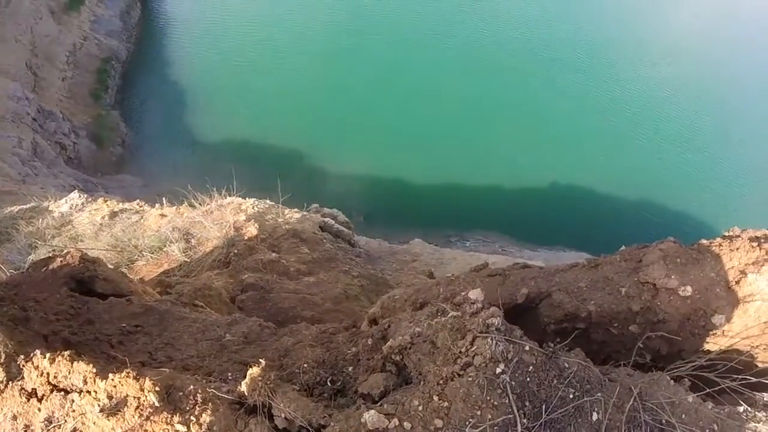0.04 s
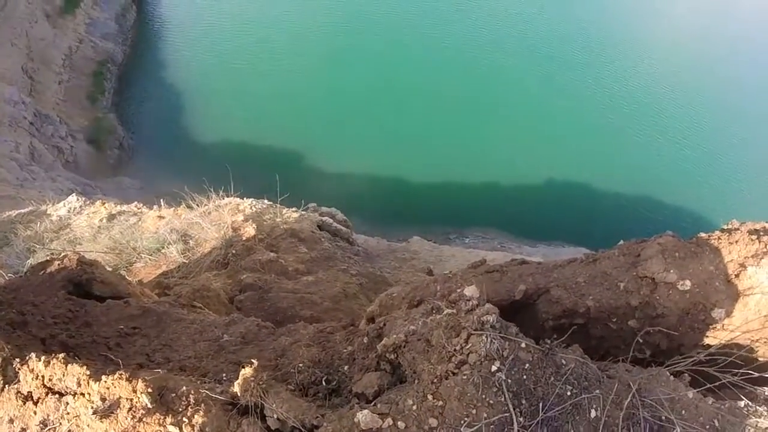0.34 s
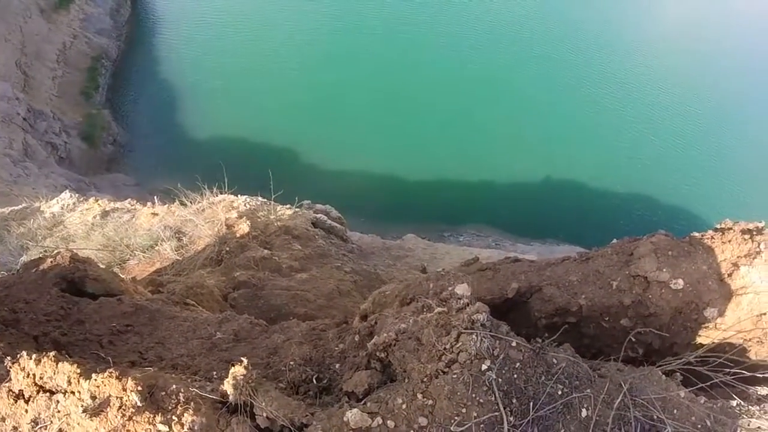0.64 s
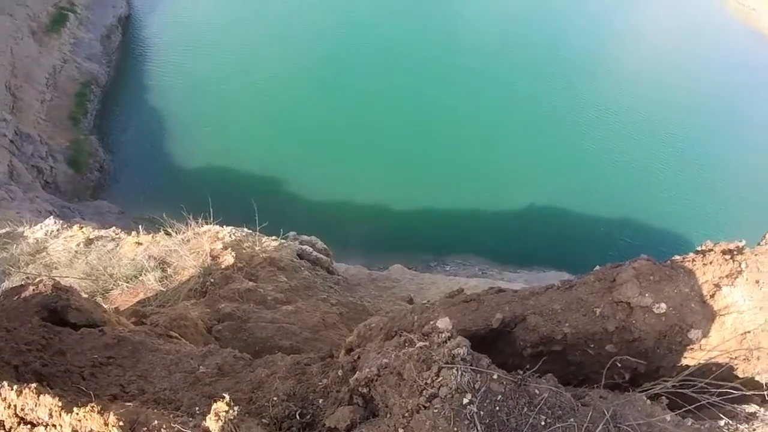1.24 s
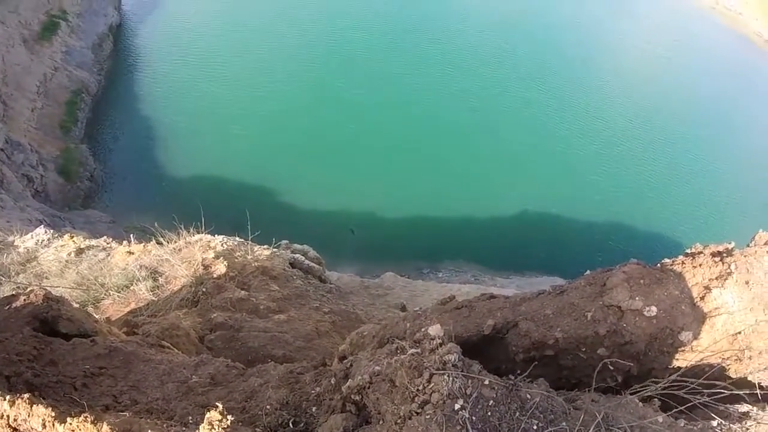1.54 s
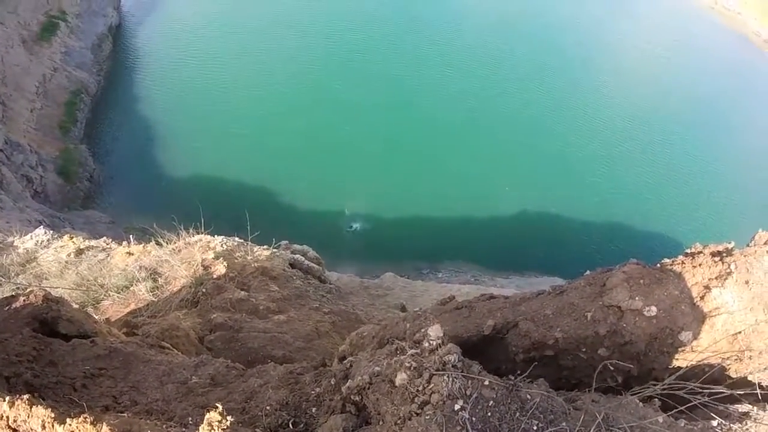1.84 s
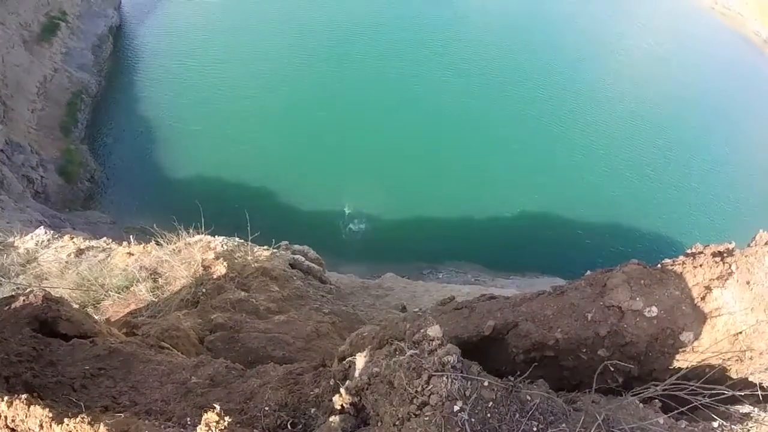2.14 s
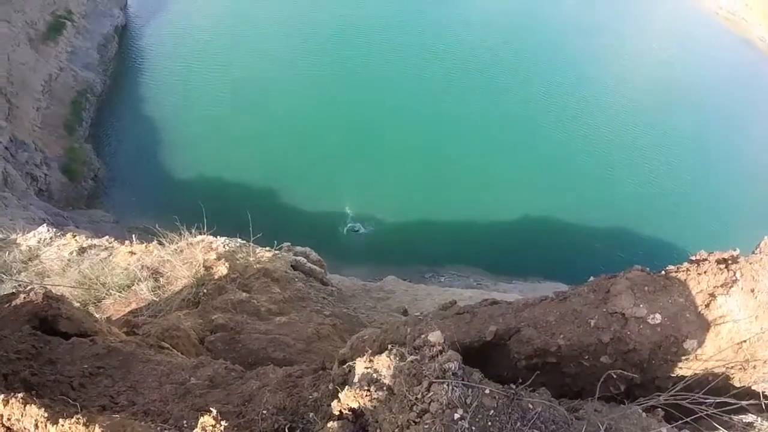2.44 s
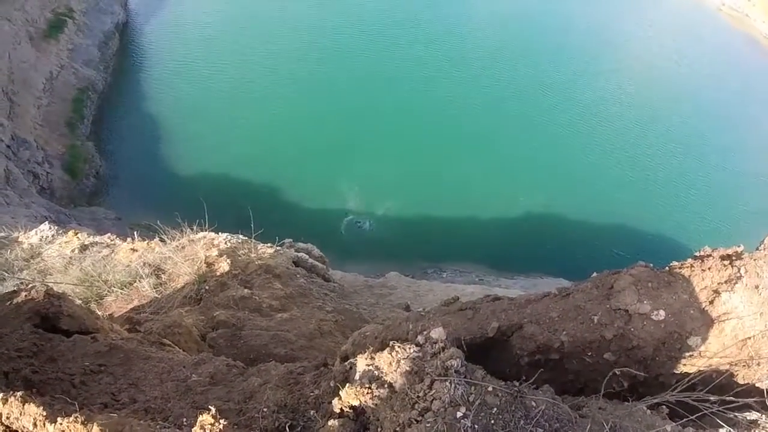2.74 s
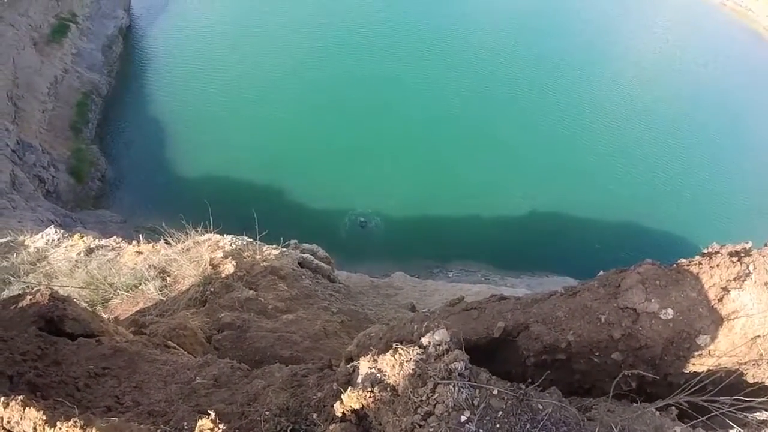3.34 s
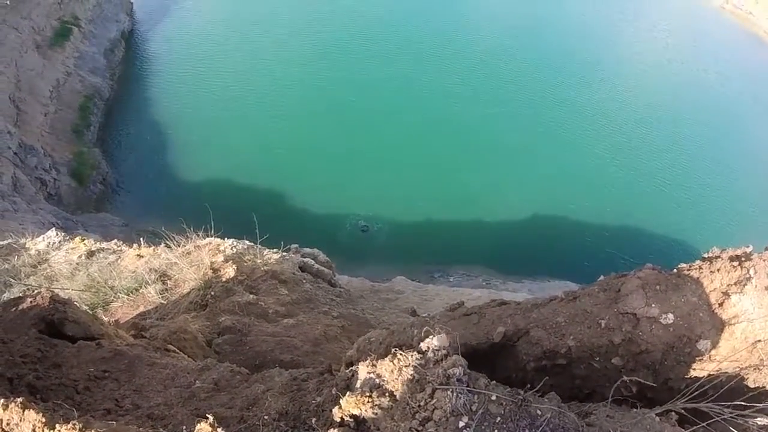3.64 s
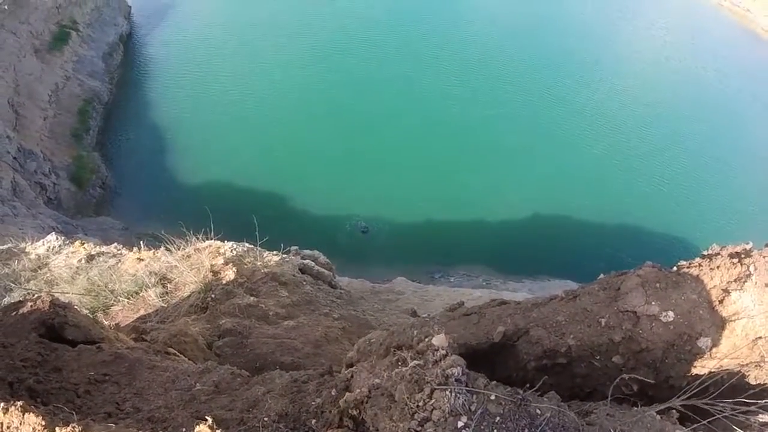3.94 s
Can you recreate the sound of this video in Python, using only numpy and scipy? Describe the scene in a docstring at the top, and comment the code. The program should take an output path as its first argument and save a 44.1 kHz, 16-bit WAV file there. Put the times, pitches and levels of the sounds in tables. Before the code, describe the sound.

A distant splash in a lake, with gusty wind rumbling on the microphone.

```python
"""Wind rumbles and buffets the microphone from the start, with soft rustles and ticks of grit nearby.
Just before two seconds, a thrown object hits a quarry lake far below the cliff edge: a slap, a burst
of torn water, then spray pattering back. Trapped air rings as bubbles, and the quarry walls echo.
The gusts are hardest after the splash, when swirls of air (eddies) thump and flap on the microphone.
A faint hiss lies under it all."""
import sys
import numpy as np
from scipy import signal
from scipy.fft import rfft, irfft
from scipy.io import wavfile
from scipy.ndimage import uniform_filter1d

SR = 44100
rng = np.random.default_rng(int(sys.argv[2]) if len(sys.argv) > 2 else 0)


def dump(signal):
    """Clip the signal to [-1, 1] and save it as 16-bit WAV at the path in sys.argv[1]."""
    limited = np.clip(np.atleast_2d(signal).T, -1, 1)
    pcm = np.round(limited * 32767).astype(np.int16)
    wavfile.write(sys.argv[1], SR, pcm)


N = 176400
T = np.arange(N) / SR

# Levels in the tables are relative. A "tone" table says how strong each frequency is.
# slaps on the lake, first the object, then lumps of thrown-up water: t/s, level/dB, decay/s
WATER_SLAPS = [(1.8429, -32, 0.0033), (1.862, -46, .008), (2.08, -43, .01), (2.12, -44, .005),
               (2.152, -39.5, .009), (2.369, -43.5, .004), (2.616, -43.5, .004), (2.753, -38.5, .003)]
# the crown of water torn up by the object: t/s, level/dB
CROWN_LEVEL = [(1.842, -91), (1.846, -39.5), (1.876, -49.5), (1.892, -41.5), (1.912, -44.5), (1.94, -48),
               (1.98, -52), (2.06, -63), (2.2, -75)]
# spray falling back: t/s, level/dB
SPRAY_LEVEL = [(2.04, -74), (2.085, -50), (2.135, -55.5), (2.165, -49.5), (2.21, -48), (2.26, -52),
               (2.38, -47), (2.55, -51.5), (2.64, -49), (2.72, -59), (2.9, -57.5), (3.15, -63), (3.5, -92)]
# boost or cut for the spray's fine droplets, which land last: t/s, level/dB
DROPLET_BOOST = [(2.1, 2), (2.35, -4), (2.64, 4), (2.8, 4), (3.1, -6)]
# tone of the slaps, crown and spray: f/Hz, level/dB
SPLASH_TONE = [(400, -30), (950, -7.5), (1300, -7), (1700, 0.5), (2050, -0.5), (2350, -6.5), (2800, -7.5),
               (3050, -7.5), (3400, -7.5), (3800, -13.5), (4200, -9.5), (5100, -15), (6600, -15.5),
               (7400, -26), (8400, -22), (12000, -32.5), (14500, -39.5)]
# large air pockets ringing in the water: t/s, f/Hz, level/dB
AIR_POCKETS = [(1.842, 1980, -28.5), (1.865, 2000, -37), (1.9, 1680, -31.5), (1.91, 1460, -34),
               (1.957, 1600, -30), (2.151, 1880, -31.5), (2.195, 1800, -35), (2.209, 1640, -36),
               (2.325, 1240, -36), (2.37, 1720, -35.5), (2.75, 1990, -36.5)]
# wind pressure rumbling on the microphone: t/s, level/dB
RUMBLE_LEVEL = [(0.0, -37), (0.09, -15), (0.14, -26), (0.28, -25), (0.32, -18.5), (0.52, -27),
                (0.73, -21.5), (1.27, -29.5), (1.55, -22.5), (1.59, -34), (1.65, -17.5), (1.68, -27),
                (1.85, -16.5), (1.87, -21.5), (2.1, -26.5), (2.7, -14), (2.75, -19), (3.05, -16.5),
                (3.14, -22), (3.3, -18), (3.5, -16.5), (3.97, -23), (4.0, -33)]
# gusts of churning air: t/s, buffeting level/dB, flutter and crackle level/dB
GUST_LEVELS = [(0, -31.5, -35), (.08, -30.5, -41.5), (.25, -34.5, -40), (.35, -27.5, -40), (.5, -33.5, -44),
               (.72, -34, -43.5), (.82, -28.5, -36.5), (.92, -26.5, -38.5), (1.16, -37.5, -48),
               (1.42, -33.5, -50), (1.73, -33, -41.5), (1.83, -24.5, -34.5), (1.94, -33.5, -41.5),
               (2.3, -36.5, -42.5), (2.46, -27, -34), (2.63, -24.5, -37), (2.72, -14.5, -28),
               (2.81, -27.5, -38.5), (2.93, -16.5, -30), (3.02, -22.5, -30.5), (3.3, -21.5, -35.5),
               (3.6, -23, -34.5), (3.79, -23.5, -41), (3.89, -30, -42), (4, -21, -36.5)]
# tones of the wind's four layers, from lowest to highest: f/Hz, level/dB
RUMBLE_TONE = [(12, -23.5), (22, 1.5), (32, 0), (60, 1.5), (100, -2.5), (135, -11.5), (200, -27.5),
               (400, -77.5), (3000, -110)]
BUFFET_TONE = [(60, -27), (100, -0.5), (130, -1.5), (200, -5), (300, -11), (390, -21), (600, -31),
               (1200, -83), (5000, -110)]
FLUTTER_TONE = [(200, -21.5), (330, 1), (400, -1), (520, -5.5), (700, -12), (900, -25.5), (1200, -36),
                (2400, -53), (14000, -89.5)]
CRACKLE_TONE = [(400, -13), (800, 8.5), (1200, 1), (1900, -3.5), (2400, -19.5), (5000, -23), (14000, -58)]
# blunt eddies that thump the microphone: t/s, level/dB
BLUNT_EDDIES = [(2.684, -2.5), (3.233, -3), (3.341, -10), (3.426, -8.5), (3.807, -8.5)]
# sharp eddies that flap across it: t/s, flap level/dB, rasp level/dB
SHARP_EDDIES = [(0.821, -35, -43), (1.867, -28, -52), (2.747, -21.5, -53), (2.849, -26, -44),
                (2.894, -23.5, -46), (2.916, -20.5, -53), (3.032, -30, -44), (3.1, -23.5, -42.5),
                (3.17, -23, -45), (3.236, -20, -49), (3.291, -25, -47.5), (3.337, -20, -50),
                (3.557, -27, -42), (3.585, -23.5, -47), (3.639, -25, -52), (3.72, -27.5, -49.5),
                (3.767, -27.5, -52)]
# grit ticking nearby: t/s, f/Hz, level/dB
GRIT_TICKS = [(.269, 7000, -54.5), (.419, 6000, -54.5), (0.446, 6500, -53), (0.739, 10500, -58),
              (1.055, 5000, -53.5), (1.653, 11200, -56), (2.968, 7440, -54), (3.104, 7860, -55),
              (3.446, 8500, -56), (3.83, 8100, -56)]
# soft rubs close by: t/s, level/dB, decay/s
RUBS = [(.04, -56, 0.04), (1.39, -62, .08), (1.595, -61, 0.012), (1.67, -57, 0.05), (3.95, -61.5, 0.11)]
# tone of those rubs: f/Hz, level/dB
RUB_TONE = [(800, -20), (1700, 0.5), (2600, -3.5), (5000, -4.5), (6600, -2.5), (7600, -16), (12500, -10.5),
            (15000, -42)]
# open-air hiss: t/s, level/dB
HISS_LEVEL = [(0, -55.5), (.6, -57), (1.3, -57.5), (1.68, -55), (3.6, -57), (4, -55)]
# tone of that hiss: f/Hz, level/dB
HISS_TONE = [(300, 9.5), (1000, -1), (1800, 0.5), (2400, -3.5), (3700, -5.5), (4400, -5.5), (5400, -8),
             (6600, -8), (7500, -11), (10800, -15.5), (12500, -21), (15000, -45)]

ECHO_DELAY_S, ECHO_FADE_S, ECHO_DB = 0.015, 0.65, -8.5  # the fade is the time to fall by 60 dB
DROPS_PER_S, DROP_CYCLES, DROP_SPREAD_DB = 3400, 2.3, 1.8
PLOPS_PER_S, PLOP_LOW_HZ, PLOP_OCTAVES, PLOP_CYCLES = 92, 1096, 0.97, 9
POCKET_CYCLES, BREAKUP_S, BREAKUP_OCTAVES, BREAKUP_DB = 5.5, .008, 0.72, -5
RUMBLE_DB, BUFFET_DB, FLUTTER_DB, CRACKLE_DB = 1, 1.5, 0.5, -19.5  # added to the wind's table levels


def splash():
    """The object hits the lake, and the quarry walls send back a fading wash of echoes."""
    water = shape_tone(slaps() + crown() + spray(), SPLASH_TONE) + plops() + air_pockets()
    walls = rng.standard_normal(N) * burst(ECHO_DELAY_S, ECHO_FADE_S / np.log(1000))
    echo = signal.fftconvolve(water, walls / np.linalg.norm(walls))[:N]
    return water + gain(ECHO_DB) * echo


def slaps(crack_db=16):
    """Each hit on the water is one sharp crack of pressure, then noise that dies quickly."""
    loudness = sum(gain(db) * burst(start, decay) for start, db, decay in WATER_SLAPS)
    out = loudness * even_out(rng.standard_normal(N), 0.003)
    for start, db, _ in WATER_SLAPS:
        out[int(start * SR)] += gain(db + crack_db)
    return out


def crown(fill_s=0.029):
    """Water torn up by the object starts as fine mist, then bigger drops fill in."""
    big, fine = split_drops(patter(mist=1) * level_curve(CROWN_LEVEL))
    impact_s = WATER_SLAPS[0][0]
    return fine + big * np.clip((T - impact_s) / fill_s, 0, 1)


def spray():
    """Drops fall back on the lake, and the finest ones sizzle."""
    big, fine = split_drops(patter(mist=.75) * level_curve(SPRAY_LEVEL))
    sizzle = gain(2.2 * wander(rate_hz=400))
    return big + fine * level_curve(DROPLET_BOOST) * sizzle


def patter(mist):
    """Thousands of uneven drops ring briefly; plain noise stands for the mist around them."""
    drops = np.zeros(N)
    for when, pitch, chance in rng.random((int(DROPS_PER_S * N / SR), 3)):
        hz = 900 * 15 ** pitch
        extra_db = -DROP_SPREAD_DB * np.log(max(chance, .004))  # a few drops stand out
        add_bubble(drops, when * T[-1], hz, DROP_CYCLES, hz * gain(extra_db), rise=0.017)
    return normalize(even_out(drops, 0.039) + mist * rng.standard_normal(N))


def split_drops(x, split_hz=3000):
    """Separate the lower sound of big drops from the higher sound of fine droplets."""
    big = signal.sosfiltfilt(signal.butter(2, split_hz, fs=SR, output="sos"), x)
    return big, x - big


def plops():
    """Lumps of falling water trap bubbles at random moments; their level follows the spray."""
    out = np.zeros(N)
    for when, pitch, size in rng.random((int(PLOPS_PER_S * N / SR), 3)):
        hz = PLOP_LOW_HZ * 2 ** (PLOP_OCTAVES * pitch)
        add_bubble(out, when * T[-1], hz, PLOP_CYCLES, gain(-11.75 + 11 * size))
    return out * level_curve(SPRAY_LEVEL)


def air_pockets(pieces=3):
    """Each air pocket rings, then breaks into a few weaker bubbles of nearby pitch."""
    out = np.zeros(N)
    for start, hz, db in AIR_POCKETS:
        add_bubble(out, start, hz, POCKET_CYCLES, gain(db))
        for late, pitch in rng.random((pieces, 2)):
            piece_hz = hz * 2 ** (BREAKUP_OCTAVES * (pitch - .5))
            add_bubble(out, start + late * BREAKUP_S, piece_hz, POCKET_CYCLES, gain(db + BREAKUP_DB))
    return out


def add_bubble(out, start, hz, cycles, strength, rise=0.013):
    """Trapped air rings and climbs in pitch, fading to about a third every `cycles` vibrations."""
    first = int(start * SR)
    length = min(int(6 * cycles / hz * SR), N - first)
    age = np.arange(length) * hz / SR / cycles  # counted in decay times
    loudness = strength * np.exp(-age) * (1 - np.exp(-age * cycles))
    phase = 2 * np.pi * cycles * age * (1 + rise * age / 2)
    out[first:first + length] += loudness * np.sin(phase)


def wind():
    """Wind pressure rumbles, while the same eddies chop up the buffeting, flutter and crackle."""
    eddies = gain(2 * wander(rate_hz=98))
    rumble = even_out(noise(RUMBLE_TONE), 0.085) * level_curve(RUMBLE_LEVEL) * gain(RUMBLE_DB)
    buffet = even_out(noise(BUFFET_TONE) * eddies, 0.081) * level_curve(GUST_LEVELS) * gain(BUFFET_DB)
    flutter = even_out(noise(FLUTTER_TONE) * eddies, 0.078) * gain(FLUTTER_DB)
    sharp_peaks = noise(CRACKLE_TONE) * eddies * gain(4 * wander(rate_hz=230))
    crackle = even_out(sharp_peaks, 0.4) * gain(CRACKLE_DB)
    return rumble + buffet + level_curve(GUST_LEVELS, column=2) * (flutter + crackle)


def thumps(width_s=.0032):
    """A blunt eddy is one rounded push of air with suction just before and after."""
    out = np.zeros(N)
    for centre, db in BLUNT_EDDIES:
        push_and_pull = 1 - 2 * ((T - centre) / width_s) ** 2
        out += gain(db) * push_and_pull * swell(centre, width_s)
    return out


def flaps(flap_s=0.0067, rasp_s=0.0026):
    """A sharp eddy is a short flap of churning air with a rasp at its peak."""
    body = sum(gain(db) * swell(centre, flap_s) for centre, db, _ in SHARP_EDDIES)
    rasp = sum(gain(db) * swell(centre, rasp_s) for centre, _, db in SHARP_EDDIES)
    return body * even_out(noise(FLUTTER_TONE), flap_s) + rasp * even_out(noise(CRACKLE_TONE), flap_s)


def grit(width_octaves=0.6):
    """Grit makes tiny dry ticks, each a burst of noise around its own pitch."""
    out = np.zeros(N)
    for start, hz, db in GRIT_TICKS:
        edges_hz = hz * 2 ** (width_octaves * np.array([-.5, .5]))
        band = signal.butter(2, edges_hz, "band", fs=SR, output="sos")
        tick = normalize(signal.sosfilt(band, rng.standard_normal(N)))
        out += gain(db) * burst(start, decay_s=0.003) * tick
    return out


def rustle(attack_s=0.022):
    """Brief grainy rubs, perhaps of a sleeve, swell and fade."""
    loudness = sum(gain(db) * np.exp(-np.maximum((peak - T) / attack_s, (T - peak) / decay))
                   for peak, db, decay in RUBS)
    grain = noise(RUB_TONE) * gain(3.5 * wander(rate_hz=230))
    return normalize(grain) * loudness


def hiss():
    """The open air hisses faintly, wavering a little."""
    return noise(HISS_TONE) * level_curve(HISS_LEVEL) * gain(.5 * wander(rate_hz=25))


def gain(db):
    """Turn decibels into a number to multiply by."""
    return 10 ** (np.asarray(db) / 20)


def normalize(x):
    """Scale a signal to an average power of 1."""
    return x / np.sqrt(np.mean(x ** 2))


def level_curve(table, column=1):
    """Join a table's dB points into a gain that changes over time."""
    rows = np.array(table, float)
    return gain(np.interp(T, rows[:, 0], rows[:, column]))


def shape_tone(x, tone):
    """Filter a sound by a tone table; white noise keeps its overall power."""
    size = 2 * N
    hz, db = np.array(tone, float).T
    bin_hz = np.arange(N + 1) * SR / size
    response = normalize(gain(np.interp(np.log(bin_hz + 1), np.log(hz), db)))
    # these steps make the filter ring only after a sound, never before it
    cepstrum = irfft(np.log(response))
    cepstrum[1:N] *= 2
    cepstrum[N + 1:] = 0
    return irfft(rfft(x, size) * np.exp(rfft(cepstrum)))[:N]


def noise(tone):
    """Noise with the given tone and a power of 1."""
    return normalize(shape_tone(rng.standard_normal(N), tone))


def wander(rate_hz):
    """A smooth random wobble with a typical size of 1."""
    span = int(SR / rate_hz)
    smoothed = uniform_filter1d(rng.standard_normal(N), span, mode="wrap")
    return normalize(uniform_filter1d(smoothed, span, mode="wrap"))


def even_out(x, span_s):
    """Flatten swells that last longer than span_s."""
    return x / np.sqrt(uniform_filter1d(x ** 2, int(span_s * SR)) + 1e-9)


def burst(start, decay_s):
    """A sudden start that dies away."""
    return (T >= start) * np.exp(-np.abs(T - start) / decay_s)


def swell(centre, width_s):
    """A brief rounded rise and fall."""
    return np.exp(-((T - centre) / width_s) ** 2)


def scene():
    """Everything reaches one microphone on the cliff edge."""
    return (wind() + thumps() + flaps() + splash() + grit() + rustle() + hiss())[None]


def record(dry, ceiling=1.3, fade_s=.004, top_hz=14500):
    """The loudest peaks are softened, both ends fade briefly, and the highest treble is cut."""
    softened = ceiling * np.tanh(dry / ceiling)
    fade = np.minimum(np.minimum(T, T[::-1]) / fade_s, 1)
    treble_cut = signal.ellip(8, .2, 70, top_hz, fs=SR, output="sos")
    return signal.sosfilt(treble_cut, softened * fade)


dry = scene()
out = record(dry)
dump(out)
```